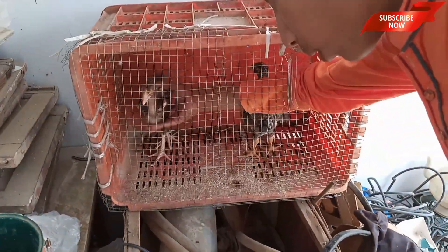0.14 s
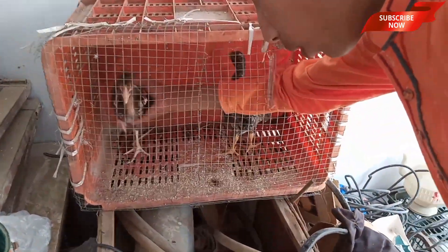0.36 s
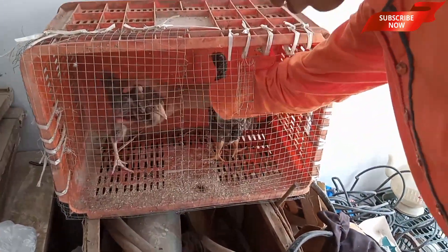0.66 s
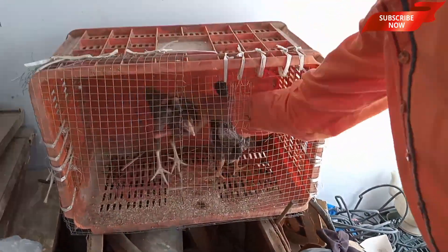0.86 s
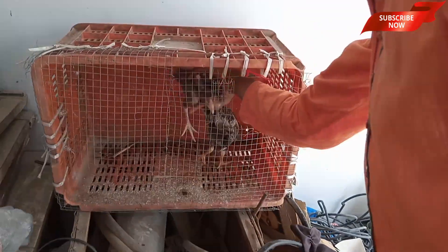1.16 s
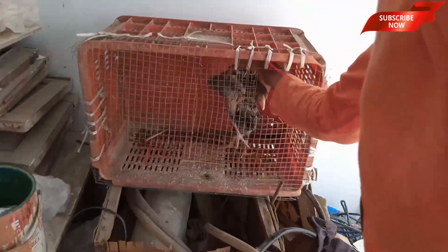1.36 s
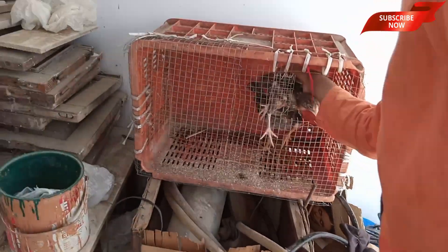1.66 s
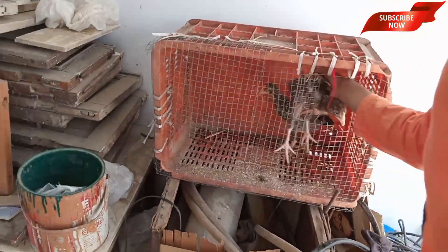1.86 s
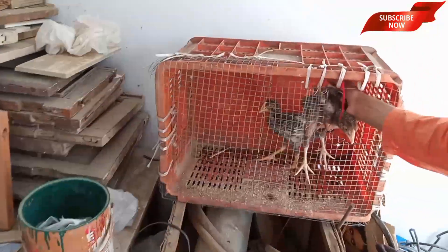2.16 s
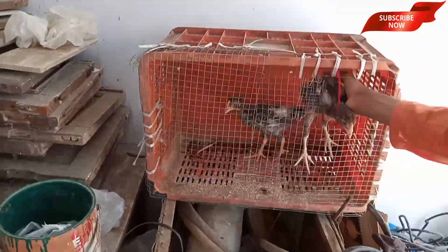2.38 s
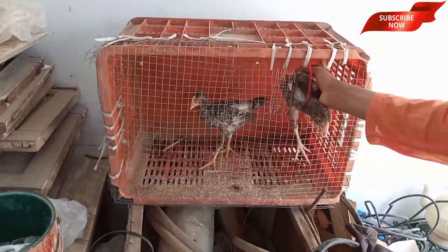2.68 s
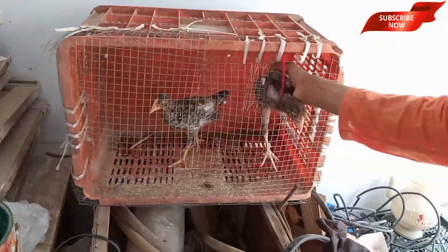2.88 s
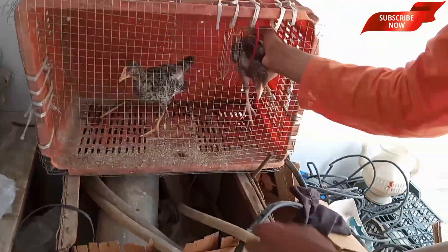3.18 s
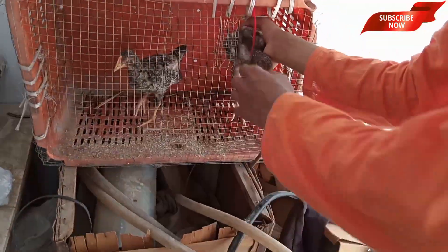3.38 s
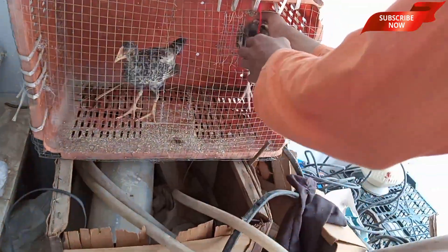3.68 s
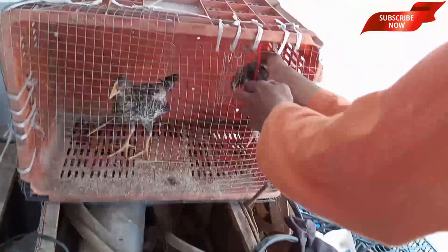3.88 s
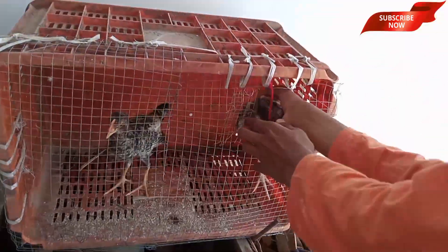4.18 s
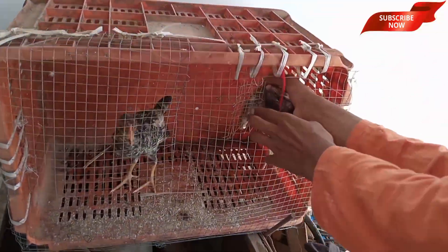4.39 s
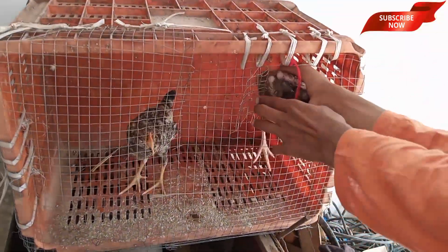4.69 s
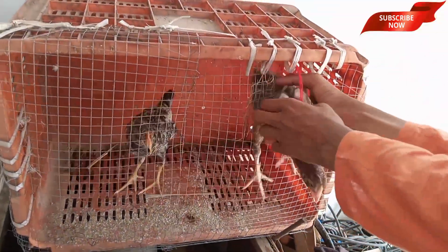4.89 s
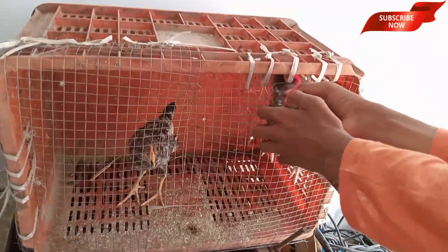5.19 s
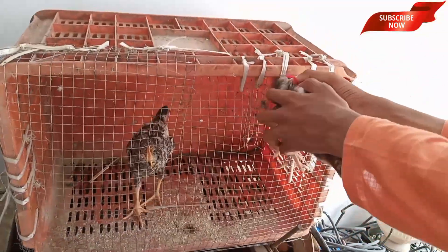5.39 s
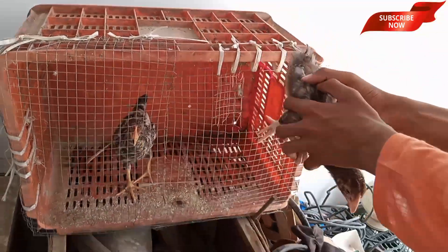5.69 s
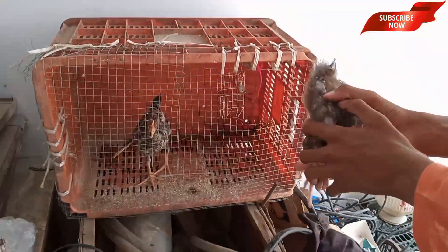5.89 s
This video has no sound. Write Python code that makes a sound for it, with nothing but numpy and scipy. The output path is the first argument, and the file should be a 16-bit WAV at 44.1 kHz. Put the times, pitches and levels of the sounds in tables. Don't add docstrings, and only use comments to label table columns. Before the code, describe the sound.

Close, dull phone pickup in a small shed: quiet chips, distant falling peeps and scratchy feet come first above a low hum. Then a handled chick cries out, first in loud arching squawks, later in rough, tearing rasps, one of them long. Near the end come piercing paired shrieks and a low broken cry, with ragged chips, a feather flurry, claw ticks and muffled plastic knocks. The background dips under the loudest calls.

```python
import sys
import numpy as np
from scipy import signal
from scipy.fft import rfft, irfft, next_fast_len
from scipy.io import wavfile
from scipy.ndimage import uniform_filter1d

SR = 44100
rng = np.random.default_rng(int(sys.argv[2]) if len(sys.argv) > 2 else 0)


def inscribe(sig):
    pcm = np.round(np.clip(np.atleast_2d(sig).T, -1, 1) * 32767)
    wavfile.write(sys.argv[1], SR, pcm.astype(np.int16))


def gain_from_decibels(decibels):
    exponent = np.asarray(decibels, float) / 20
    return 10 ** exponent


N = 266805


def evened(x):
    return x / np.sqrt(np.mean(abs(x) ** 2) + 1e-20)


def read(points, hz):
    point_hz, value = np.transpose(points)
    return np.interp(np.log(hz + 1), np.log(point_hz + 1), value)


def add(mix, start_s, sound):
    part = mix[round(start_s * SR):][:len(sound)]
    part += sound[:len(part)]


def wander(length, width_hz):
    settle = 2000
    noise = rng.standard_normal((length + settle, 2)) @ [1, 1j]
    lowpass = signal.butter(4, np.clip(width_hz / 2, 1, SR / 3), fs=SR, output="sos")
    return evened(signal.sosfilt(lowpass, noise)[settle:])


def band(hz, width_hz, length):
    carrier = np.exp(2j * np.pi * np.cumsum(hz * np.ones(length)) / SR)
    return evened((wander(length, width_hz) * carrier).real)


def unroll(rows):
    s, *columns = np.transpose(rows)
    t = np.arange(s[0], s[-1], 1 / SR)
    return t, [np.interp(t, s, column) for column in columns]


def partial(phase, rough, blur_hz):
    rough = np.clip(rough, 0, 1)
    envelope = np.sqrt(1 - rough) + np.sqrt(rough) * wander(len(phase), blur_hz)
    return np.sqrt(2) * (envelope * np.exp(1j * phase)).real


def whistle(rows, blur_hz):
    t, (hz, level_db, rough) = unroll(rows)
    tone = partial(2 * np.pi * np.cumsum(hz) / SR, rough, blur_hz)
    return t[0], gain_from_decibels(level_db) * tone * signal.windows.tukey(len(t), .15)


def glide(start_s, length_s, level_db, start_hz, end_hz, bend, rough):
    u = np.linspace(0, 1, num=20)
    hz = start_hz + (end_hz - start_hz) * u ** bend
    ends_db = -8 * (2 * u - 1) ** 2
    return np.transpose([start_s + length_s * u, hz, level_db + ends_db, rough + 0 * u])


def tap(start_s, peak_db, hz, width_hz, t60):
    t = np.arange(0, t60, 1 / SR)
    rise = np.minimum(t / .003, 1)
    return start_s, gain_from_decibels(peak_db - 5.5 - 60 * t / t60) * rise * band(hz, width_hz, len(t))


# frequency_hz, density_db [dB per Hz]
YARD_SPECTRUM = [(12, -50.5), (20, -39), (42, -15.5), (119, 1.5), (156, 3.5), (245, -7), (495, -11),
                 (1450, -16.5), (2650, -24), (3590, -26), (4730, -65.5), (6550, -30.5), (8000, -20.5),
                 (10400, -62), (17600, -120)]
# time_s, level_db
MOTOR_HUM = [(0, -51), (1.06, -54), (1.3, -33), (1.65, -41), (2.02, -51), (2.5, -41), (2.75, -36),
             (3.1, -41), (4.28, -51.5), (4.72, -57.5), (5.45, -39), (5.6, -48), (6.05, -45)]


def yard():
    frames, hz = N // 512 + 5, np.fft.rfftfreq(2048, 1 / SR)
    real, imag, patches = rng.standard_normal((frames, 1025, 3)).T
    patches = evened(uniform_filter1d(uniform_filter1d(patches, 8, 0), 12, 1))
    spectrum = (real + 1j * imag) * gain_from_decibels(read(YARD_SPECTRUM, hz)[:, None] + 2.5 * patches)
    wash = signal.istft(spectrum, nperseg=2048, noverlap=1536)[1][:N]
    out = gain_from_decibels(-42.5 - 3.5) * evened(wash)
    t, (hum_db,) = unroll(MOTOR_HUM)
    second_db = -55 - .4 * (hum_db - hum_db.mean()) - 1.2 * t
    second = gain_from_decibels(second_db - 1) * band(300, 30, len(t))
    motor_whine = gain_from_decibels(-58 - 5.5) * band(670, 97, len(t))
    first = gain_from_decibels(hum_db - 5.5) * partial(2 * np.pi * 151 * t, .7, 30)
    add(out, 0, second + motor_whine + first)
    return out


def bouts(rows, rest_db):
    t = np.linspace(0, N / SR, num=1200)
    swells = sum(gain_from_decibels(db) * np.exp(-2 * ((t - s) / half) ** 2) for s, half, db in rows)
    return np.interp(np.arange(N) / SR, t, gain_from_decibels(rest_db) + swells)


# middle_s, half_length_s, level_db
FEATHER_BOUTS = [(.05, .12, -48), (.33, .1, -49), (.68, .2, -51), (1.1, .12, -52), (1.4, .15, -55),
                 (2.1, .15, -46), (2.5, .12, -54), (3.98, .12, -55), (4.72, .06, -50), (5.48, .08, -47),
                 (5.59, .09, -40), (5.72, .1, -51)]
# middle_s, half_length_s, level_db
FOOT_BOUTS = [(0, .07, -37), (.57, .2, -48), (1.1, .14, -51), (1.4, .12, -49), (2.1, .15, -50),
              (2.48, .08, -51), (2.95, .08, -54), (4.73, .05, -38), (5.5, .08, -41), (5.66, .07, -39),
              (5.84, .05, -54)]


def rustle():
    grain = gain_from_decibels(2.2 * wander(N, 60).real)
    hiss, scuffle = band(6300, 2300, N), band(2900, 3400, N)
    return grain * (bouts(FEATHER_BOUTS, -61) * hiss + bouts(FOOT_BOUTS, -60) * scuffle)


# frequency_hz, t60_s
SHED_DECAY = [(300, .3), (1800, .2), (3800, .3), (7000, .17)]


def shed(x):
    taps = np.zeros(SR // 2)
    at = np.arange(100, len(taps) - 12, 12)
    taps[at + rng.integers(0, 12, len(at))] = rng.choice([-1., 1.], len(at))
    hz, t, spectrum = signal.stft(taps, SR, nperseg=256)
    decay = gain_from_decibels(-60 * t / read(SHED_DECAY, hz)[:, None])
    tail = signal.istft(spectrum * decay, SR, nperseg=256)[1]
    return signal.fftconvolve(x, tail / np.linalg.norm(tail))[:N]


# start_s, length_s, level_db, start_hz, end_hz
FAR_PEEPS = [(.21, .172, -47, 4850, 2750), (.84, .05, -49, 4250, 4150), (.888, .032, -46, 4120, 2800),
             (1.015, .05, -38, 3410, 2950), (1.285, .13, -46.5, 4720, 3450), (1.42, .04, -46, 3450, 3150),
             (1.48, .08, -51, 3470, 3065), (2.44, .08, -47, 3900, 2820), (3.21, .09, -37, 4000, 3300),
             (5.335, .025, -33, 3386, 3360), (5.38, .025, -39, 3905, 3910), (5.69, .145, -43.5, 4740, 2750),
             (.21, .055, -49, 5720, 5520), (1.3, .11, -49.5, 5300, 4450), (1.27, .07, -55, 3480, 3350),
             (5.69, .06, -50, 5600, 5000)]


def far_peeps(mix):
    for row in FAR_PEEPS:
        add(mix, *whistle(glide(*row, bend=1.7, rough=.35), blur_hz=250))


# start_s, peak_db, centre_hz
CLAW_TICKS = [(0.401, -34, 5600), (0.9877, -26.5, 5950), (1.0984, -44, 6110), (1.1652, -34.5, 6070),
              (1.2401, -46, 6000), (1.3594, -29, 6200), (1.8538, -25, 5930), (3.0294, -44, 5730),
              (3.5332, -31, 6020), (4.0864, -34, 5560), (4.862, -27, 6000), (5.0858, -9.5, 5960),
              (5.549, -27, 5860)]


def claw_ticks(mix):
    for row in CLAW_TICKS:
        add(mix, *tap(*row, width_hz=6400, t60=.046))


# start_s, peak_db, centre_hz
CRATE_KNOCKS = [
    (1.789, -34, 598),
    (1.829, -33, 597),
    (2.195, -35.5, 606),
    (2.532, -29.5, 600),
    (3.549, -35, 603),
    (4.865, -35.5, 610),
    (5.27, -33, 520),
    (5.329, -33, 500),
    (5.569, -32, 600),
]


def crate_knocks(mix):
    for row in CRATE_KNOCKS:
        add(mix, *tap(*row, width_hz=800, t60=.11))


def chip(start_s, level_db, start_hz, land_hz, ragged_hz):
    hold_s, drop_s = .0195, .007
    t = np.arange(0, 4 * hold_s, 1 / SR)
    hz = land_hz + (start_hz - land_hz) * np.exp(-(t / drop_s) ** 2)
    phase = 2 * np.pi * np.cumsum(hz) / SR
    rough = .3 + ragged_hz / 2000
    swell = t / (.8 * hold_s)
    swell = swell * np.exp(1 - swell)
    strands = [(1, 0), (.7, -52 + 52 * rough), (1.27, -42 + 45 * rough), (1.6, -30 + 27 * rough),
               (2, -22 + 10 * rough), (3, -26 + 14 * rough)]
    voice = np.zeros(len(t))
    for multiple, db in strands:
        flicker = gain_from_decibels(5 * rough * wander(len(t), 90).real)
        tone = partial(multiple * phase, .9 * rough, 200 + .4 * ragged_hz)
        voice += gain_from_decibels(db) * flicker * tone * swell ** (1.1 + .45 * multiple)
    return start_s, gain_from_decibels(level_db - 2.5 * rough) * voice


# start_s, level_db, start_hz, landing_hz, raggedness_hz
CHIP_CALLS = [(0, -32.5, 3586, 3070, 750), (.095, -38.5, 2130, 1789, 300), (.252, -31, 3940, 1950, 1110),
              (.442, -31.5, 3820, 1920, 1300), (.62, -31, 3455, 1986, 1050), (.8, -34, 2860, 2816, 250),
              (.81, -38, 2920, 1955, 600), (.986, -42.5, 2370, 2460, 400), (1.04, -42, 2930, 2300, 300),
              (1.394, -30, 2770, 1816, 398), (3.592, -27, 2410, 1813, 400), (4.685, -28.5, 3270, 2900, 900),
              (4.706, -28.5, 2166, 1800, 600), (4.725, -31, 1900, 1650, 550),
              (4.972, -25.5, 3016, 1700, 600), (5.157, -24.5, 4110, 2107, 1200),
              (5.178, -25, 2400, 2300, 900), (5.24, -33, 2514, 2066, 900), (5.416, -19, 3514, 2014, 500),
              (5.612, -20, 3760, 1950, 650)]


def chips(mix):
    for row in CHIP_CALLS:
        add(mix, *chip(*row))


# start_s, length_s, level_db, start_hz, end_hz
STRAND_NOTES = [(3.565, .07, -27, 3300, 3420), (3.605, .1, -25, 4950, 4700), (3.67, .1, -27, 4500, 4090),
                (4.105, .1, -32, 1886, 1727), (4.18, .14, -29, 4640, 4480), (4.17, .16, -28, 3480, 3400),
                (4.13, .12, -28, 5430, 5640), (5.205, .065, -32, 4250, 4880), (4.96, .035, -24, 7330, 7310),
                (0, .025, -38, 6300, 6500), (.278, .016, -41, 7040, 7120), (.412, .035, -45, 2344, 4240),
                (.53, .08, -43, 3100, 2100), (.785, .028, -51, 3750, 3900), (.815, .04, -42, 5040, 4840),
                (.8, .018, -38.5, 5770, 5750), (.985, .035, -37, 4870, 4670),
                (1.045, .045, -45, 3800, 3700)]


def strands(mix):
    for row in STRAND_NOTES:
        add(mix, *whistle(glide(*row, bend=1.2, rough=.55), blur_hz=500))


def shriek(start_s, length_s, peak_db, start_hz, fade_db):
    top_hz, swoop_s, rise_s, clearing_s = 6000, .016, .012, .05
    t = np.linspace(0, length_s, num=40)
    hz = top_hz + (start_hz - top_hz) * np.exp(-t / swoop_s)
    onset_db = -18 * np.maximum(1 - t / rise_s, 0)
    level_db = peak_db + onset_db + fade_db * (t / length_s) ** 1.5
    rough = .22 + .6 * np.exp(-t / clearing_s)
    return np.transpose([start_s + t, hz, level_db, rough])


# start_s, length_s, peak_db, start_hz, fade_db
SHRIEK_CALLS = [
    (3.058, .15, -17, 5050, -36),
    (5.09, .13, -12, 5600, -22),
    (5.222, .138, -14, 5274, -15),
]
# start_s, peak_db, centre_hz, width_hz, t60_s
BREATH_BURSTS = [
    (3.058, -19, 4476, 5000, 0.45),
    (3.066, -8, 5500, 1500, 0.09),
    (5.095, -8, 5320, 1200, .12),
    (5.227, -8, 5200, 800, .12),
]


def shrieks(mix):
    for row in SHRIEK_CALLS:
        add(mix, *whistle(shriek(*row), blur_hz=350))
    for row in BREATH_BURSTS:
        add(mix, *tap(*row))


def squawk(rows, throat, blur_hz, shiver, lumps_db):
    t, (hz, effort_db, rough, beak) = unroll(rows)
    jitter = wander(len(t), 537).real + wander(len(t), 30).imag * rough
    phase = 2 * np.pi * np.cumsum(hz * (1 + shiver * jitter)) / SR
    voice, power = 0, 0
    for k in range(1, 10):
        gain = gain_from_decibels(read(throat, k * hz / beak)) * (k * hz < 8800)
        blurred = np.minimum(rough, .8) * min(1, .4 + .25 * k)
        voice = voice + gain * partial(k * phase, blurred, blur_hz * min(k, 4))
        power = power + gain ** 2
    voice = voice / np.sqrt(power)
    lumps = evened(gain_from_decibels(lumps_db * wander(len(t), 410).real))
    return t[0], gain_from_decibels(effort_db) * voice * lumps * signal.windows.tukey(len(t), .1)


def cry(curve, rough_ends, rough_middle, beak):
    s, hz, effort_db = np.transpose(curve)
    middle = np.sin(np.pi * (s - s[0]) / (s[-1] - s[0]))
    rough = rough_ends + (rough_middle - rough_ends) * middle
    return np.transpose([s, hz, effort_db, rough, beak * (hz / hz.max()) ** .18])


def rasp(start_s, length_s, peak_db, sag_db, release_s):
    pitch_hz, rough, beak, rise_s, edge_db = 1278, .8, .935, .036, -19
    s = start_s + np.array([0, rise_s, length_s - release_s, length_s])
    effort_db = peak_db + np.array([edge_db, 0, sag_db, sag_db + edge_db])
    return [(when, pitch_hz, db, rough, beak) for when, db in zip(s, effort_db)]


# time_s, pitch_hz, effort_db
HOARSE_WHINE = [(2.865, 1870, -42), (2.88, 1820, -35.5), (2.92, 1700, -35), (2.96, 1394, -42),
                (3.06, 1272, -40)]
# start_s, length_s, peak_db, sag_db [while held], release_s
RASP_CALLS = [
    (3.05, .13, -29, -5, .04),
    (3.14, .24, -36, 3.5, .08),
    (3.543, .367, -19, -8, .1),
    (4.098, .58, -22, -1.5, .04),
]
# frequency_hz, gain_db
RASP_RESONANCES = [(600, -25), (1250, -10.5), (1900, 1.5), (2550, -2.5), (3900, 1), (5200, -1.5), (6400, 2),
                   (7500, -4.5)]


def rasps(mix):
    for rows in [cry(HOARSE_WHINE, .6, .7, .55)] + [rasp(*row) for row in RASP_CALLS]:
        add(mix, *squawk(rows, RASP_RESONANCES, blur_hz=330, shiver=.014, lumps_db=2.4))
        half = np.array(rows) * [1, .5, 1, 1, 1] + [0, 0, -14, 0, 0]
        add(mix, *squawk(half, RASP_RESONANCES, blur_hz=400, shiver=.03, lumps_db=2.4))


# time_s, pitch_hz, effort_db
CLEAR_CRIES = [
    [(1.856, 1800, -36), (1.874, 2200, -24), (1.89, 2540, -20), (1.911, 2616, -20), (1.943, 2403, -15.5),
     (1.983, 2035, -14.5), (2.0, 1440, -14.5)],
    [(2.232, 1975, -38), (2.244, 2060, -26), (2.26, 2226, -23.5), (2.35, 2065, -18.5), (2.37, 1783, -20),
     (2.39, 1110, -29)],
    [(4.865, 1500, -42), (4.89, 1650, -27), (4.91, 1655, -25), (4.95, 1540, -19), (5.0, 1410, -20),
     (5.03, 1237, -25), (5.07, 620, -35)],
    [(5.27, 1359, -30), (5.33, 1405, -23), (5.37, 1370, -22), (5.402, 1265, -23), (5.428, 996, -32),
     (5.45, 588, -28)],
]
PITCH_SHIVER = [.011, .032, .009, .008]
BEAK_OPENING = [1, .96, 1.05, .84]
# frequency_hz, gain_db
CRY_RESONANCES = [(600, -2), (1250, 0), (1900, -8), (2550, 0), (3900, 7.5), (4700, 7), (5400, -6),
                  (6300, 9), (7500, -4.5)]


def cries(mix):
    for curve, shiver, beak in zip(CLEAR_CRIES, PITCH_SHIVER, BEAK_OPENING):
        rows = cry(curve, .42, .08, beak)
        add(mix, *squawk(rows, CRY_RESONANCES, blur_hz=150, shiver=shiver, lumps_db=2.5))


# time_s, level_db
YARD_BUSTLE = [(0, -2), (2.4, -1), (3.1, 1), (5.4, 1), (5.75, 0), (5.9, -4), (6.05, -4)]


def ducked(background, chicks):
    power_db = 10 * np.log10(abs(uniform_filter1d(chicks ** 2, 900)) + 1e-12)
    excess_db = np.maximum(uniform_filter1d(power_db, 900) + 24, 0)
    bustle_db = np.interp(np.arange(N) / SR, *np.transpose(YARD_BUSTLE))
    low = signal.sosfiltfilt(signal.butter(2, 280, fs=SR, output="sos"), background)
    return gain_from_decibels(-.05 * excess_db) * low + gain_from_decibels(-1.1 * excess_db + bustle_db) * (background - low)


def scene():
    background = yard() + rustle()
    near, far = np.zeros((2, N))
    for source in (far_peeps, claw_ticks, chips):
        source(far)
    for source in (crate_knocks, strands, shrieks, rasps, cries):
        source(near)
    direct = gain_from_decibels(-2.5) * near + gain_from_decibels(1.5) * far
    chicks = direct + shed(gain_from_decibels(-4.0) * near + gain_from_decibels(-3.0) * far)
    return (chicks + ducked(background, chicks))[None]


def top_cut(x):
    return signal.sosfilt(signal.butter(12, 8410, fs=SR, output="sos"), x)


# frequency_hz, gain_db
MICROPHONE_RESPONSE = [(25, -14), (60, -2.5), (6400, 1), (7000, -2), (7500, -13.5), (8000, -25.5),
                       (8380, -33), (8450, -71), (22000, -80)]


def record(dry):
    size = next_fast_len(N + 4096)
    response = gain_from_decibels(read(MICROPHONE_RESPONSE, np.fft.rfftfreq(size, 1 / SR)))
    heard = irfft(rfft(dry, size) * response, size)[:, :N]
    return top_cut(heard)


dry = scene()
out = record(dry)
inscribe(out)
```